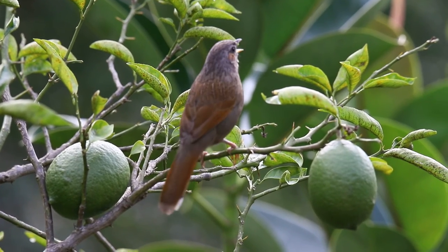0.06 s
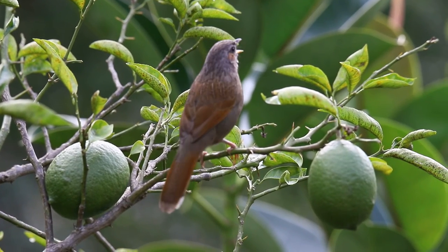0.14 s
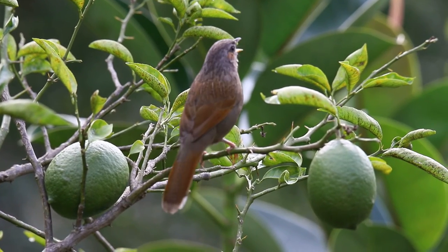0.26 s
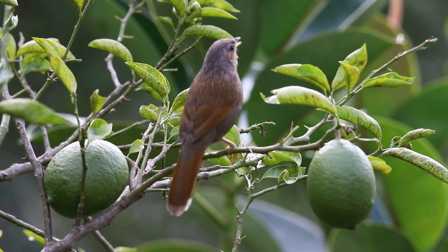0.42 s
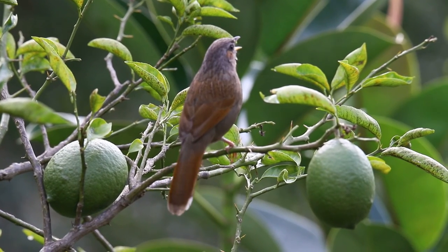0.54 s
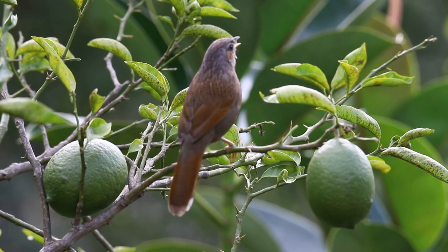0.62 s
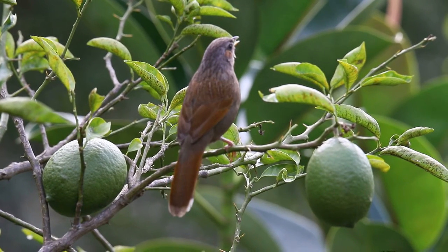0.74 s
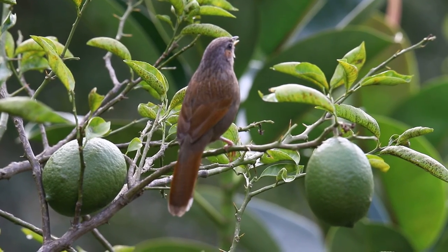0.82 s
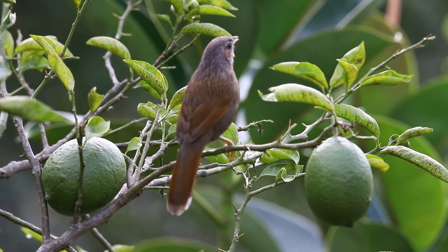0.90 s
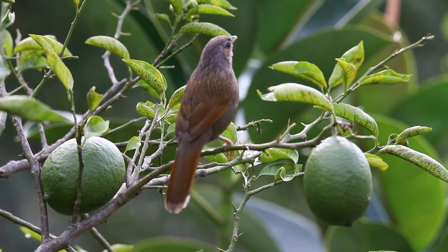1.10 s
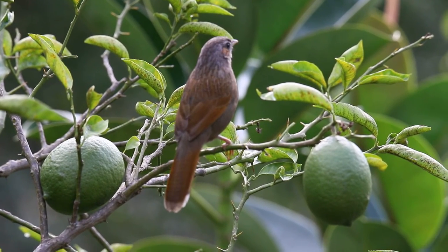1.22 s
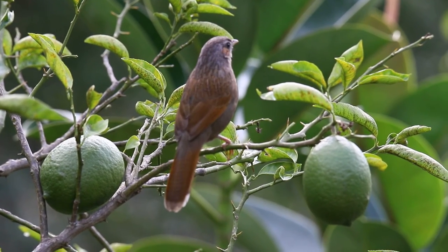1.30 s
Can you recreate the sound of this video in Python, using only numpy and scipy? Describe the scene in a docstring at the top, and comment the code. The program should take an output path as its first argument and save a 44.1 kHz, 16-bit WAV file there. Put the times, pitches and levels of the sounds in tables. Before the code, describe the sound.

Birdsong in a garden: seven fast chirps and a clear swooping whistle over faint rumble.

```python
"""A low outdoor rumble, a faint hum and thin far tones are there from the start. Over them a small bird
on a garden branch sings seven quick arched chips, each peaking higher than the last. About half a second
in comes one loud whistle that swoops down, turns breathy, lifts and slides away. Foliage and walls close
by scatter the song throughout; the far tones stop early in the whistle, the rumble and hum stay."""
import sys
import numpy as np
from scipy import signal
from scipy.fft import rfft, irfft, next_fast_len
from scipy.io import wavfile
from scipy.ndimage import uniform_filter1d, map_coordinates

SR = 44100
rng = np.random.default_rng(int(sys.argv[2]) if len(sys.argv) > 2 else 0)


def generate_wav(signal):
    """Clip the signal to [-1, 1] and save it as 16-bit WAV at the path in sys.argv[1]."""
    frames = np.transpose(np.atleast_2d(signal))
    scaled = np.clip(frames, -1, 1) * 32767
    pcm = np.round(scaled).astype(np.int16)
    wavfile.write(sys.argv[1], SR, pcm)


N = 59535

# The chip phrase (start [s], rise [s], fall [s], top pitch [Hz], pitch a third into the fall [Hz],
# two thirds in [Hz], end pitch before the closing flick [Hz], level [dB], overtone send [dB])
CHIP_NOTES = [(0.018, 0.0062, 0.017, 2290, 2187, 2298, 2220, -30, -22.5),
              (.070, 0.008, 0.02, 2830, 2634, 2505, 2430, -29, -27),
              (.130, 0.0084, 0.029, 3140, 2790, 2700, 2100, -30, -26.5),
              (0.187, .020, 0.017, 4300, 3380, 2680, 2400, -27, -29.5),
              (0.252, 0.018, .024, 5200, 3895, 2750, 2580, -26.5, -27.5),
              (0.32, 0.018, .025, 5400, 4280, 2770, 2520, -25.5, -28),
              (.393, .013, .039, 6210, 5000, 4123, 2910, -25.5, -29.5)]
# Throat resonance on the fundamental (pitch [Hz], gain [dB])
THROAT_EQ = [(2000, -17.5), (2800, -9), (3500, -2), (4150, 3.5), (4900, -7.5), (6200, -20.5)]
# Tone shaping of a chip's overtones (frequency [Hz], gain [dB])
CHIP_OVERTONE_EQ = [(4000, 0), (6900, 0), (7700, -12), (9000, -15), (10500, -30), (15000, -34)]
# Colour of the air riding on a chip (frequency [Hz], gain [dB])
CHIP_BREATH_EQ = [(1500, -23.5), (3000, 14.5), (5000, 11.5), (7000, -2), (8700, 1), (10500, -24),
                  (12000, -12), (15000, -30.5)]
def chips():
    """Each chip flicks up and falls again, louder on the way down and near the throat's resonance."""
    launch_hz, closing_s, closing_drop = 1985, 0.0056, 0.34
    upstroke_db_per_octave_per_s = -0.0997  # the faster the upward flick, the weaker it is
    t, out = clock(), np.zeros(N)
    breath = amp(-25) * hiss(CHIP_BREATH_EQ)
    for start, rise, fall, top, high, low, last, db, overtone_db in CHIP_NOTES:
        risen = np.clip((t - start) / rise, 0, 1)
        falling_hz = np.interp((t - start - rise) / fall, np.linspace(0, 1, 4), [top, high, low, last])
        arch_hz = smooth(launch_hz + (falling_hz - launch_hz) * np.sin(np.pi / 2 * risen ** 1.4))
        closing = np.clip((t - start - rise - fall) / closing_s + 1, 0, 1)
        hz = arch_hz * (1 - closing_drop * closing ** 2)  # a last quick flick downward
        phase = unsteady_phase(hz)
        overtones = sum(amp(overtone_db + tilt_db + along(CHIP_OVERTONE_EQ, k * hz)) * np.sin(k * phase)
                        for k, tilt_db in [(2, 7), (3, -7)])
        tone = amp(along(THROAT_EQ, hz)) * np.sin(phase) + overtones + breath
        octaves_per_s = np.log2(top / launch_hz) / rise
        duck_db = upstroke_db_per_octave_per_s * octaves_per_s * (1 - risen ** 2)
        envelope = gate(start, start + rise + fall, attack=0.0023, release=0.0064)
        out += amp(db + duck_db) * envelope * tone
    return np.sqrt(2) * out


# The whistle's pitch envelope (time [s], pitch [Hz])
WHISTLE_PITCH = [(.474, 2515), (.481, 5697), (.486, 6176), (.498, 5010), (.516, 3813), (.53, 3230),
                 (.55, 2825), (.58, 2470), (.6, 2341), (.622, 2347), (.632, 3203), (.675, 3796),
                 (.701, 3550), (.726, 3117), (.757, 3086), (.839, 2620), (.905, 2307), (.985, 1790),
                 (1.005, 1490)]
# Its volume envelopes (time [s], level [dB], octave level [dB])
WHISTLE_LEVELS = [(0.473, -51.5, -75), (0.494, -44, -73), (0.518, -21.5, -67.5), (.567, -21, -73.5),
                  (0.592, -37, -60), (0.618, -39.5, -38.5), (0.638, -19, -67.5), (.68, -21.5, -56),
                  (.77, -23, -75), (0.832, -21, -71), (.86, -28, -59), (0.911, -30, -57.5),
                  (0.962, -43.5, -51), (0.979, -39.5, -43), (1.0, -52, -40), (1.014, -70, -56)]
# Its sheen, harmonics 3 to 6 (frequency [Hz], level against the fundamental [dB])
SHEEN_EQ = [(5000, -47), (6300, -30), (6900, -15), (7300, -58.5), (10500, -63.5), (11500, -48),
            (13000, -51.5), (15000, -51.5)]
RASP_START_S, RASP_END_S = 0.569, 0.622  # the bottom of the swoop
def whistle():
    """A nearly pure tone with flickering overtones; its octave comes forward where it is low and weak."""
    start, end = WHISTLE_PITCH[0][0], WHISTLE_LEVELS[-1][0]
    hz, = automation(WHISTLE_PITCH)
    db, octave_db = automation(WHISTLE_LEVELS)
    phase = unsteady_phase(hz)
    flicker_db = lambda: 1.5 * wobble(per_s=70)
    sheen = sum(amp(along(SHEEN_EQ, k * hz) + flicker_db()) * (k * hz < SR / 2) * np.sin(k * phase)
                for k in range(3, 7))
    sheen *= gate(RASP_START_S, end, attack=0.096, release=0.03)
    octave = amp(octave_db + flicker_db() / 2) * np.sin(2 * phase)
    tone = amp(db) * (np.sin(phase) + sheen) + octave
    return np.sqrt(2) * tone * gate(start, end, attack=0.0047, release=0.0053)


# Colour of the whistle's airy edge (frequency [Hz], gain [dB])
RASP_EQ = [(1500, -40), (3000, 7), (5000, 8.5), (7000, -3), (9000, -12), (15000, -27.5)]
def rasp():
    """A little hiss rides on the whistle and comes forward at the bottom of the swoop."""
    whistle_db, _ = automation(WHISTLE_LEVELS)
    swell = amp(-46) * gate(RASP_START_S, RASP_END_S, attack=0.022, release=0.014)
    return hiss(RASP_EQ) * (swell + amp(whistle_db - 35))


# Colour of the reverb return (frequency [Hz], gain [dB])
SCATTER_EQ = [(1500, 4.5), (2500, 1), (4200, 6), (6000, 4.5), (15000, 10.5)]
def scatter(song, predelay_s, t60_s, width=1.18):
    """The garden scatters the song into a diffuse, decaying stereo tail."""
    age = np.maximum(np.arange(SR // 2) / SR - predelay_s, 0)
    bloom = 1 - np.exp(-age / 0.0019)
    mid, side = rng.standard_normal((2, len(age))) * amp(-60 * age / t60_s) * bloom
    tail = np.array([mid + width * side, mid - width * side])
    wet = signal.fftconvolve(song[None], tail / np.linalg.norm(tail[0]), axes=1)[:, :N]
    return filtered(wet, lambda hz: amp(along(SCATTER_EQ, hz)))


# Early reflections (delay [s], level [dB], left over right [dB])
WALL_TAPS = [(.0055, -21.5, -1), (.012, -18, 3.5), (0.022, -34.5, -2.5)]
def walls(song):
    """Each nearby wall throws back one delayed, panned copy of the song."""
    return filtered(song, lambda hz: sum(amp(db) * pan(left_db) * np.exp(-2j * np.pi * hz * delay)
                                         for delay, db, left_db in WALL_TAPS))


# Faint held tones far off (start [s], end [s], pitch [Hz], level [dB])
DISTANT_NOTES = [(0, 0.157, 4015, -55.5), (0, 0.06, 7790, -60.5), (0.177, 0.573, 732.7, -56.5)]
def far_tones():
    """Thin tones from the distance, wavering differently in each ear."""
    out = np.zeros((2, N))
    for start, end, hz, db in DISTANT_NOTES:
        ears = np.array([amp(1.8 * wobble(per_s=24.8)) * np.sin(unsteady_phase(hz)) for _ in range(2)])
        out += amp(db) * ears * gate(start, end, attack=0.0031, release=0.019)
    return np.sqrt(2) * out


# Colour of the outdoor bed (frequency [Hz], relative noise density [dB])
AIR_EQ = [(15, -36), (25, -32), (53, 2), (69, -3), (148, -3.5), (221, -7), (281, -2), (421, -8), (567, -10),
          (703, -10), (1200, -13), (1950, -16), (2360, -18.5), (5140, -25), (15500, -47)]
# Its stereo image (frequency [Hz], left-right correlation [1 = mono])
AIR_CORRELATION = [(50, 1), (125, 0.92), (250, 0.92), (500, 0.83), (1000, .25), (3000, 0.062), (12000, .1)]
def outdoor_air():
    """Outdoor rumble and hiss, almost mono in the bass and wide in the treble."""
    def mid_side_gains(hz):
        spread = np.arccos(np.clip(along(AIR_CORRELATION, hz), -1, 1)) / 2
        return amp(along(AIR_EQ, hz)) * [np.cos(spread), np.sin(spread)]
    mid, side = filtered(rng.standard_normal((2, N)), mid_side_gains)
    return amp(-41.5) * unit_rms(np.array([mid + side, mid - side]))


# The low drone (frequency [Hz], level [dB])
HUM_PARTIALS = [(47.5, -55), (95, -54), (140, -53)]
def hum(fade_db_per_s=-0.5):
    """A faint hum that wavers in level and phase and eases off slightly."""
    t = clock()
    drone = sum(amp(db + 2 * wobble(per_s=4)) * np.sin(2 * np.pi * hz * t + 0.76 * wobble(per_s=6.68))
                for hz, db in HUM_PARTIALS)
    return np.sqrt(2) * drone * amp(fade_db_per_s * (t - t.mean()))


def amp(db):
    """Decibels to gain."""
    return 10 ** (np.asarray(db) / 20)


def unit_rms(x):
    """x at rms 1."""
    return x / np.sqrt(np.mean(x ** 2) + 1e-20)


def pan(left_db):
    """Channel gains that put the left left_db above the right."""
    return amp(left_db * np.array([[0.5], [-0.5]]))


def along(points, hz):
    """Read a (frequency, value) curve on a log frequency axis."""
    frequencies, values = np.transpose(points)
    return np.interp(np.log(hz + 1), np.log(frequencies + 1), values)


def clock():
    """The time of each sample in seconds."""
    return np.arange(N) / SR


def smooth(curve):
    """Round the corners over about 3 ms."""
    return uniform_filter1d(curve, size=130)


def automation(rows):
    """One smooth lane for each column after the time."""
    times, *columns = np.transpose(rows)
    return [smooth(np.interp(clock(), times, column)) for column in columns]


def wobble(per_s):
    """A smooth random modulator with per_s knots a second."""
    return map_coordinates(rng.standard_normal(4096), [clock() * per_s], mode="wrap")


def unsteady_phase(hz, jitter=0.003):
    """Running phase of a slightly unsteady pitch."""
    return 2 * np.pi * np.cumsum(hz * (1 + jitter * wobble(per_s=160))) / SR


def gate(start, end, attack, release):
    """Fade in, hold, fade out; times in seconds."""
    t = clock()
    return np.sin(np.pi / 2 * np.clip(np.minimum((t - start) / attack, (end - t) / release), 0, 1))


def filtered(x, response):
    """x through a frequency response."""
    size = next_fast_len(N + SR // 2)
    return irfft(rfft(x, size) * response(np.fft.rfftfreq(size, 1 / SR)), size)[..., :N]


def hiss(eq):
    """Noise coloured by an EQ curve, at rms 1."""
    return unit_rms(filtered(rng.standard_normal(N), lambda hz: amp(along(eq, hz))))


# Pan automation of the song and its echoes (time [s], left over right [dB])
SONG_PAN = [(0, 0.5), (.2, 2.2), (.5, 1.5), (.8, 2), (.87, 0), (.94, -2.5), (.99, 1)]
def scene():
    """The bird sits near the centre among its echoes, in front of the outdoor bed."""
    song = chips() + whistle() + rasp()
    left_db, = automation(SONG_PAN)
    left_lead_s = 8e-6
    direct = filtered(song, lambda hz: np.exp(1j * np.pi * hz * left_lead_s * np.array([[1], [-1]])))
    leaves = amp(-5) * scatter(song, predelay_s=0.0024, t60_s=0.14)
    far_tail = amp(-14.5) * scatter(song, predelay_s=0.024, t60_s=0.51)
    bird = pan(left_db) * (direct + walls(song) + leaves + far_tail)
    return bird + far_tones() + pan(left_db=-0.5) * (outdoor_air() + hum())


def record(dry):
    """A brick-wall high cut on the mix."""
    return filtered(dry, lambda hz: hz < 15750)


dry = scene()
out = record(dry)
generate_wav(out)
```